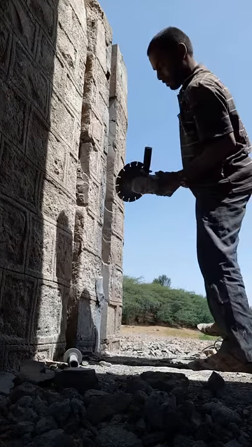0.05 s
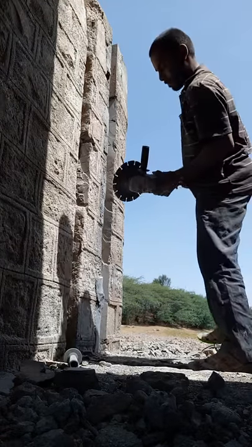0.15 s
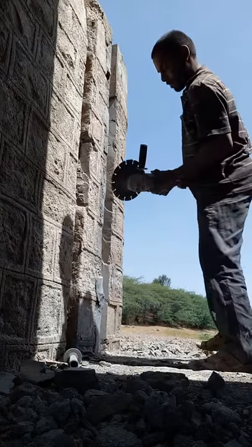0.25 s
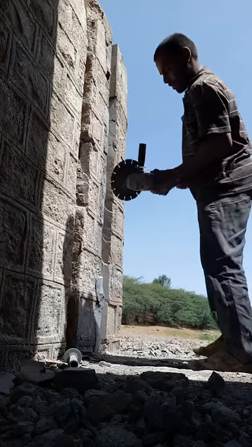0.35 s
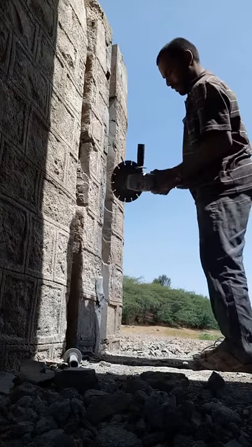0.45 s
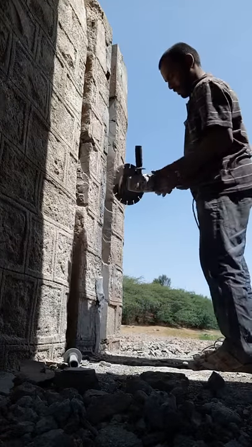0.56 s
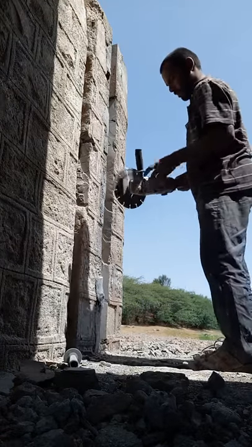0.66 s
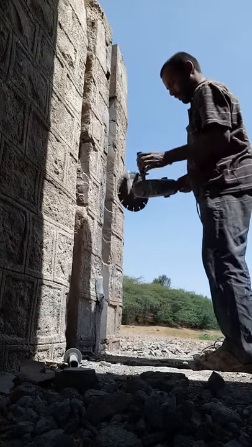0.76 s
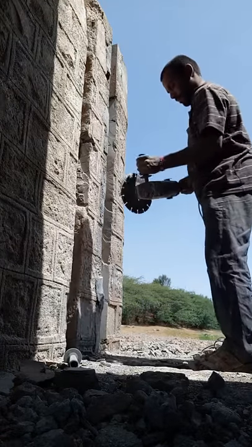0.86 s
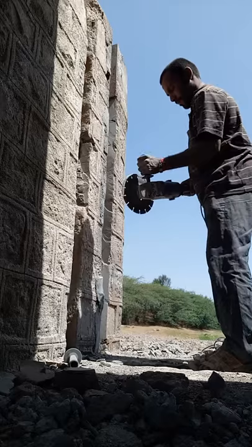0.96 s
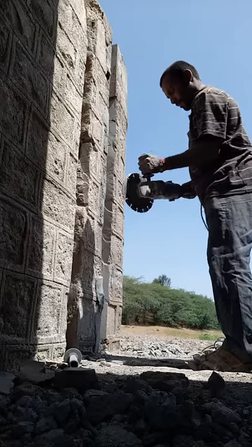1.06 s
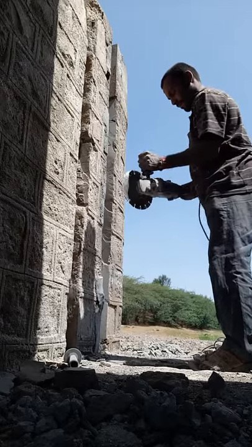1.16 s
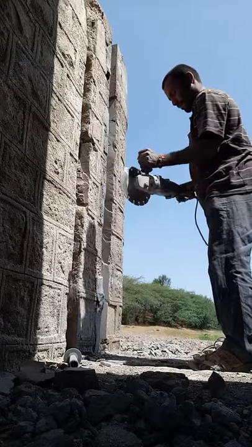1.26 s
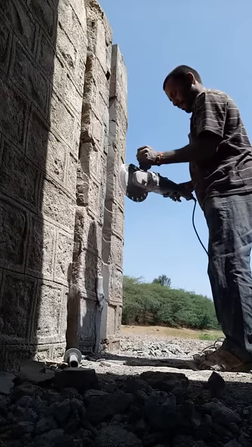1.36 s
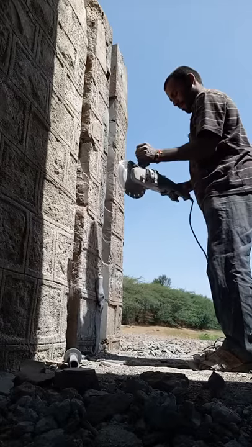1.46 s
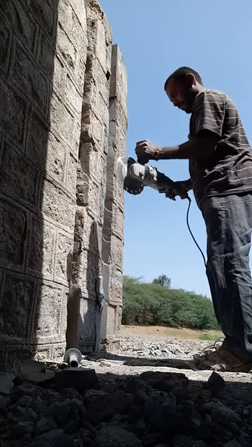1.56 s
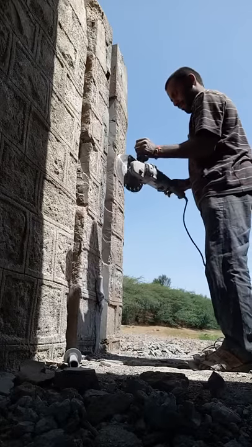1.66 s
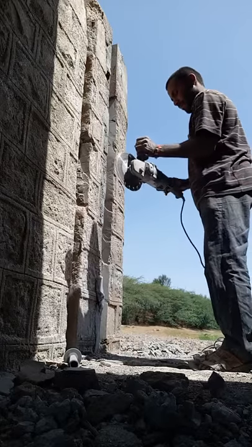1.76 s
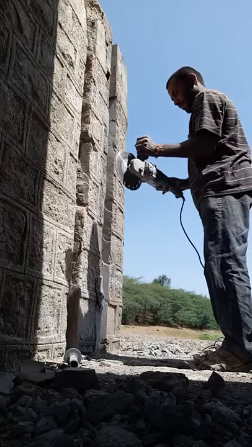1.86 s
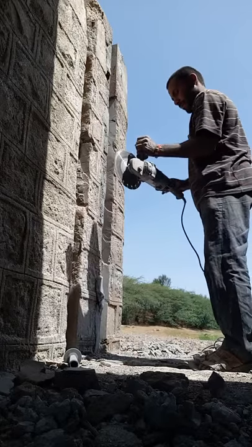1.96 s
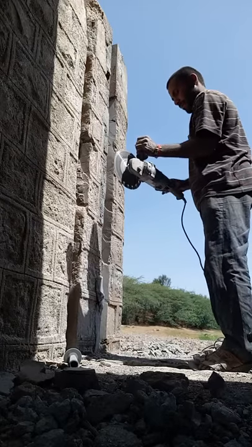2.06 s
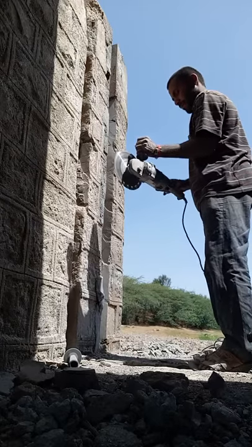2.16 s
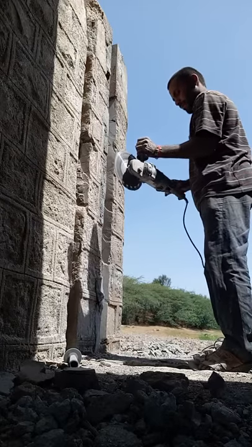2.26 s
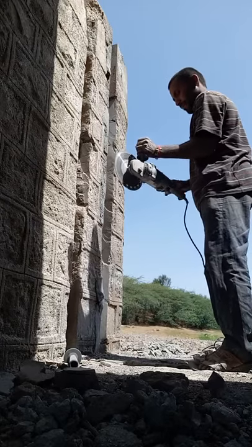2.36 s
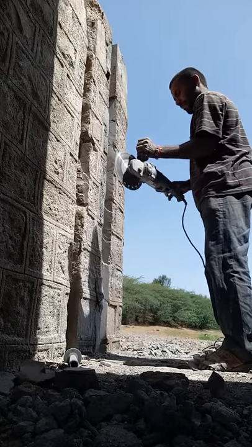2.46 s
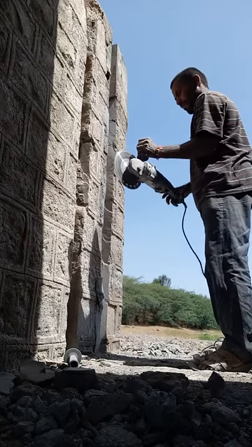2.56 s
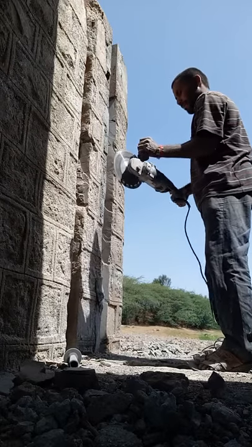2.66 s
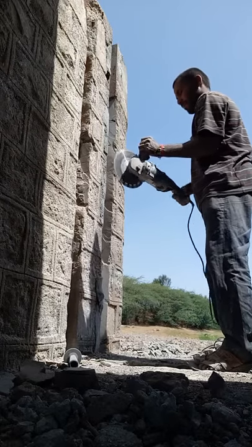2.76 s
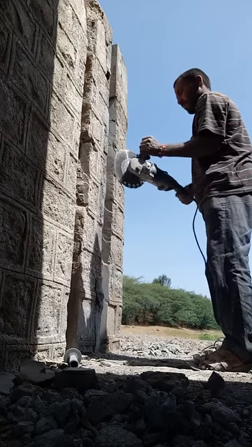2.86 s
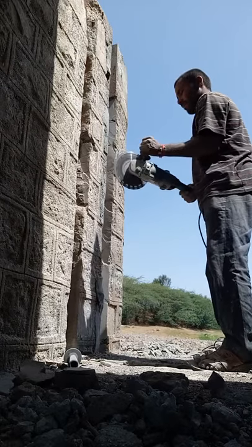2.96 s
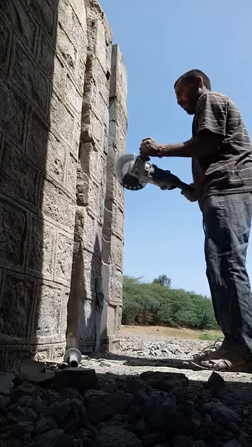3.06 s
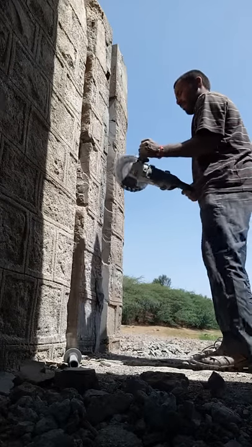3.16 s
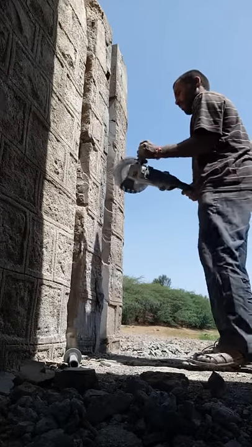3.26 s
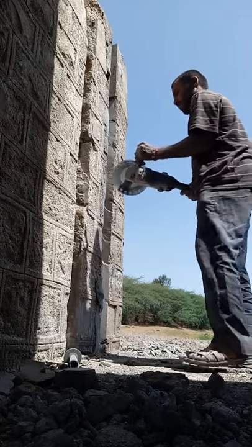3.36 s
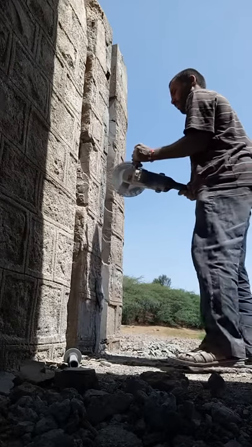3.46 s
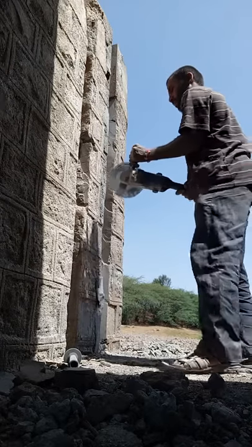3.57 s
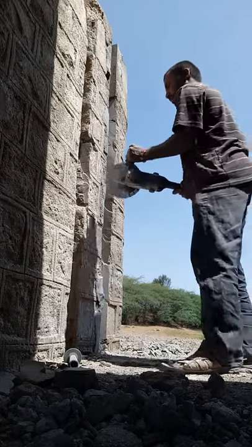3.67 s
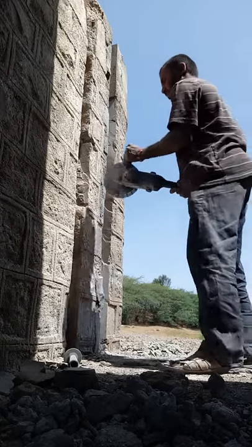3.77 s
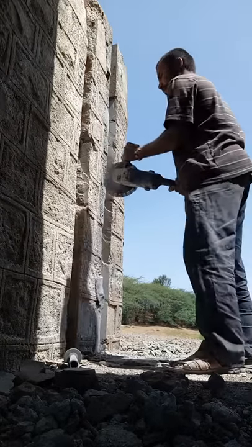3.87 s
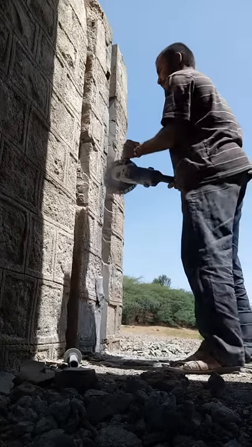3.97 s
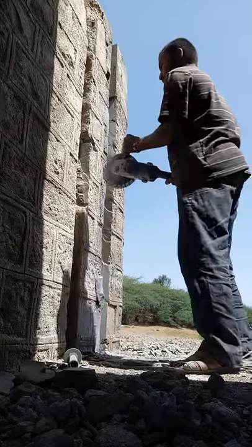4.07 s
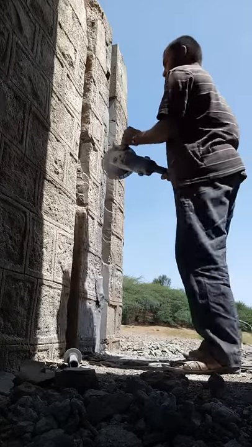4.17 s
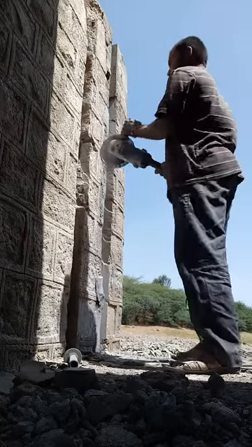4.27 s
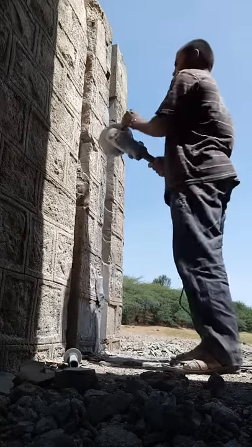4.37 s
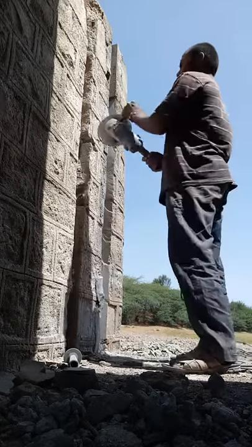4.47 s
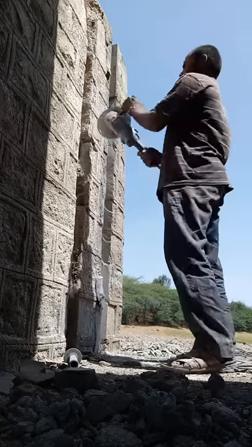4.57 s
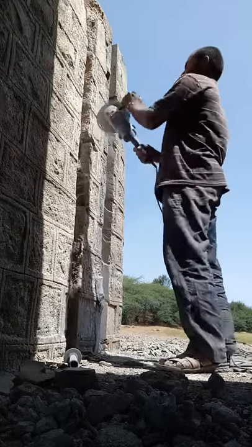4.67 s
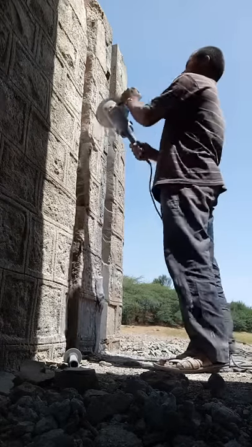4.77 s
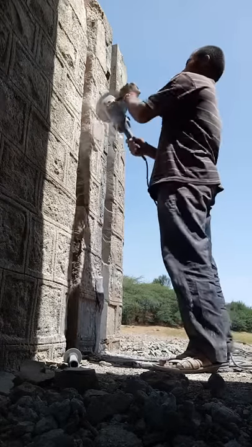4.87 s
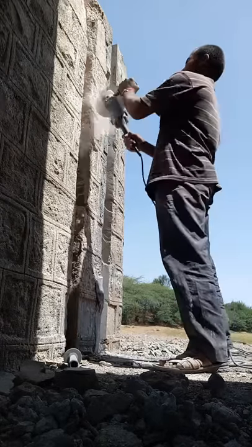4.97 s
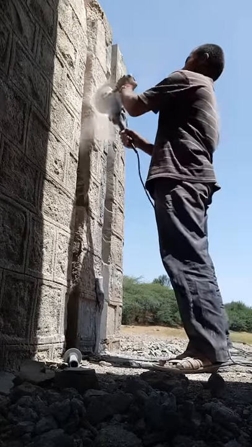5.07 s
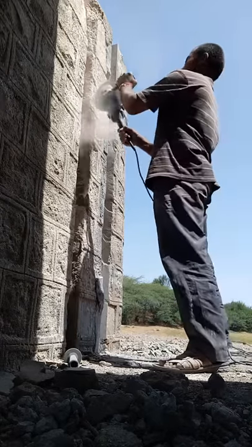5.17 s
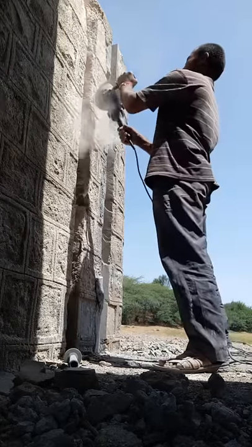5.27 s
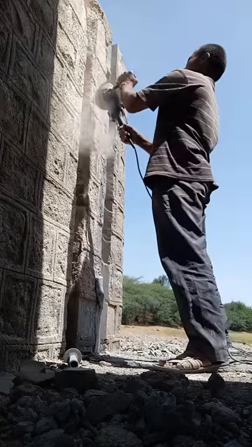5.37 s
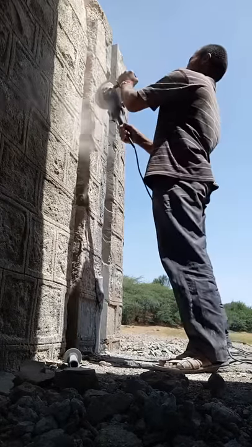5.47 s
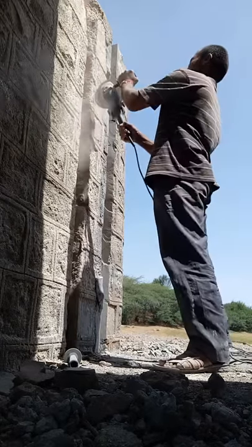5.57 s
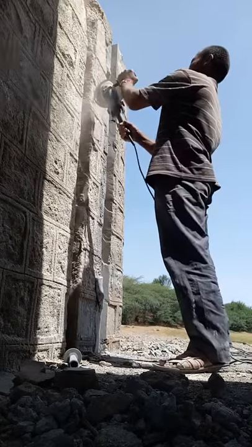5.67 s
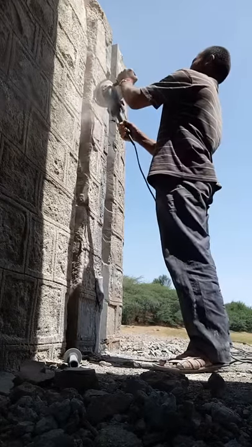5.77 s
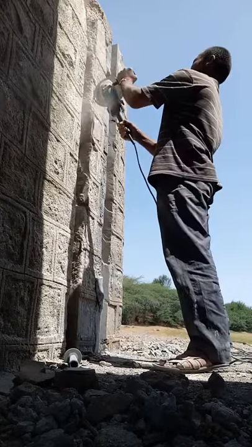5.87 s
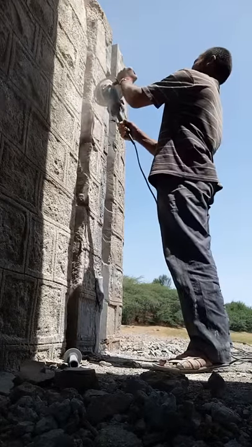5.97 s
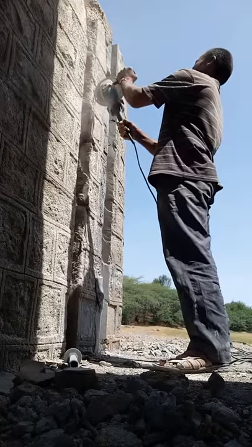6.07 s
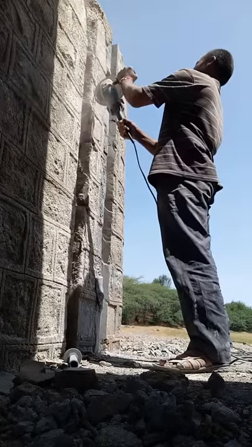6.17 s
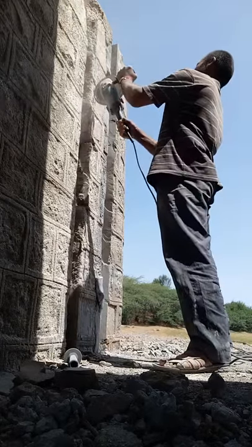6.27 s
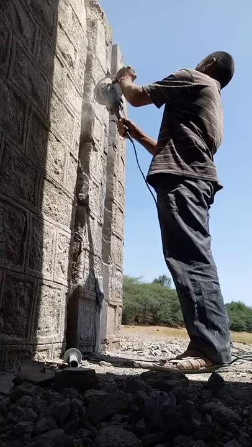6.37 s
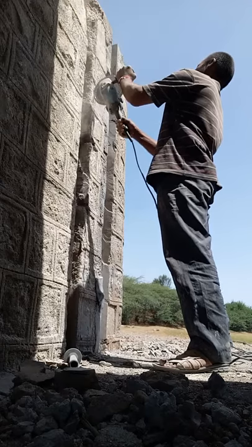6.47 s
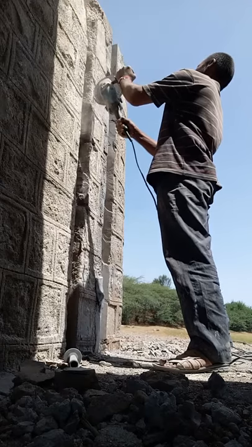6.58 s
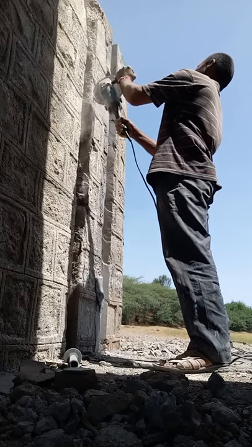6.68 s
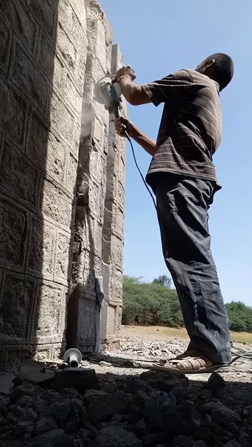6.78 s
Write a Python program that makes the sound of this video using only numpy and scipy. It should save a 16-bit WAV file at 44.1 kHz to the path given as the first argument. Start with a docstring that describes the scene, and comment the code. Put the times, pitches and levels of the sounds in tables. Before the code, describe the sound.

Soft handling knocks, then a large angle grinder clicks on, buzzes, rattles and squeals up to a harsh whine before its blade bites stone.

```python
"""Soft knocks, brushing clothes and a step on loose stones: a large angle grinder is gripped outdoors.
Switched on, it buzzes at twice the mains frequency; its gears rattle by impact in a resonant case as it runs up.
A dry bearing squeals by stick-slip; brush crackle, turbulent cooling air and a thin rotor whine take over.
The diamond blade grazes a stone wall three times, then bites: random grit impacts ring the modes of its disc."""
import sys
import numpy as np
from scipy import signal
from scipy.fft import rfft, irfft
from scipy.io import wavfile
from scipy.ndimage import uniform_filter1d

SR = 44100
rng = np.random.default_rng(int(sys.argv[2]) if len(sys.argv) > 2 else 0)


def master(y):
    """Save y as 16-bit WAV."""
    cut = np.clip(np.atleast_2d(y).T, -1, 1)
    pcm = np.round(cut * 32767)  # scale
    wavfile.write(sys.argv[1], SR, pcm.astype(np.int16))


N = 300321
TIME = np.arange(N) / SR  # s

SWITCH_ON_S, MAINS_HZ = 1.138, 50
# run-up towards a top speed in turns per s, with two time constants; then a steady sag in the cut
TOP_HZ, SPIN_UP_S, CURRENT_RISE_S, SAG_HZ_PER_S = 442.8, 1.57, .092, 15


def motor_speed():
    """Second-order run-up: torque waits for the current, speed nears its limit, then the cut drags it down."""
    age = np.maximum(TIME - SWITCH_ON_S, 0)
    slow_part = SPIN_UP_S * np.exp(-age / SPIN_UP_S)
    fast_part = CURRENT_RISE_S * np.exp(-age / CURRENT_RISE_S)
    shortfall = (slow_part - fast_part) / (SPIN_UP_S - CURRENT_RISE_S)
    sag = SAG_HZ_PER_S * np.maximum(TIME - BITE_EVENTS[0][0], 0)
    return np.maximum(TOP_HZ * (1 - shortfall) - sag, 0)


# force of the gear rattle, easing as the run-up ends: t/s, level/dB
GEAR_FORCE_CURVE = [(1.15, -17), (2.1, -17.5), (2.7, -18.5), (3.4, -22.5), (3.52, -31.5), (4.3, -29.5),
                    (4.9, -24), (5.05, -34), (6.8, -36)]
# brief dips in level, applied here to the rattle: t/s, depth/dB
LEVEL_DIPS = [(1.63, 6), (2.935, 7), (4.73, 10.5)]
# resonances of the gear case: f/Hz, width/Hz, level/dB
CASE_MODES = [(259.3, 23, -12.5), (849, 51, -8), (1140, 64, -28), (1201.6, 11.6, 5.5), (1227.7, 25.2, 11.5),
              (1640, 54, -27), (1825, 32, -8.5), (3220, 22, 2), (3400, 37, 1), (3623, 17.6, -1.5),
              (3600, 28, -10), (4355, 125, -17.5), (6620, 105, -11.5), (7110, 70, -17)]
# spectrum of the dense, unresolved clatter: f/Hz, level/dB
CLATTER_SPECTRUM = [(60, -36), (150, -41), (270, -19), (500, -25.5), (750, -2.5), (1100, -3.5), (1500, 1.5),
                    (2700, -5), (3500, 1), (5000, -11), (7100, -1), (7600, -28), (11500, -22), (13500, -37),
                    (15400, -27)]
DIP_S = .013
# the stutter deepens with speed; the dragging bearing damps the rattle
STUTTER_PER_S, STUTTER_DB, STUTTER_GROWTH_DB, DRAG_DB = 11, 0.73, 2.5, 5.5
RING_DAMPING_DB = 1.5  # the case rings less at top speed, where the teeth stay in contact


def gears(speed):
    """Backlash impact: teeth knock at random and excite the case modes, less while the bearing drags."""
    share = speed / TOP_HZ
    level_db, = in_time(GEAR_FORCE_CURVE)
    drag = squealing()
    drag_db = DRAG_DB * drag / drag.max()
    stutter_db = (STUTTER_DB + STUTTER_GROWTH_DB * share ** 4) * drift(STUTTER_PER_S)
    dip_db = sum(db * np.exp(-((TIME - s) / DIP_S) ** 2) for s, db in LEVEL_DIPS)
    force = from_db(level_db - dip_db - drag_db + stutter_db + drift(35))
    ringing = resonate(grains(per_s=5000, spread_db=0.0), CASE_MODES)
    ringing = colour(ringing, [(60, -18), (250, 0), (7200, 6), (7700, -9.0), (15000, -32)])
    # a steady drive keeps the ring from swelling far above its mean
    ringing = rms_one(ringing / uniform_filter1d(ringing ** 2, SR // 40) ** 0.39)
    clatter = colour(grains(per_s=3100, spread_db=3.5), CLATTER_SPECTRUM)
    ring_gain = from_db(-0.9 - RING_DAMPING_DB * share ** 2)
    return force * (ring_gain * ringing + from_db(-7.5) * clatter)


# spells of drag in the dry bearing: t/s, length/s, level/dB
SQUEAL_EVENTS = [(1.586, 0.04, -30), (1.648, 0.3, -22), (2.032, 0.44, -37.5), (2.463, 0.77, -37)]
SQUEAL_ATTACK_S, SQUEAL_RELEASE_S = 0.007, 0.029


def squealing():
    """Dry friction: the gain of the bearing's drag over time."""
    return sum(from_db(db) * held(s, length, SQUEAL_ATTACK_S, SQUEAL_RELEASE_S)
               for s, length, db in SQUEAL_EVENTS)


# resonances of the bearing: f/Hz, width/Hz, level/dB
BEARING_MODES = [(3300, 34, 1), (4400, 150, -4.5), (6730, 30, 12), (6730, 87, 8.5), (6960, 74, 6),
                 (8340, 62, -2), (9820, 160, -17), (10420, 130, -1.5), (10820, 120, -5), (11530, 320, -5.5)]


def bearing():
    """Stick-slip friction: tiny slips, in throbs at 31 Hz, excite the bearing's resonances."""
    throb = np.sin(2 * np.pi * 31 * TIME + 0.68 * drift(4.4))
    slips = grains(per_s=11000, spread_db=4.0) * squealing() * from_db(4.3 * throb)
    return colour(resonate(slips, BEARING_MODES),
                  [(200, -16), (2000, 11.5), (7200, -1), (7700, -9), (9200, -6), (9800, 7.5),
                   (11800, -1.5), (13000, -11)])


# strength of the rotor whine against its own frequency: f/Hz, level/dB
WHINE_RESPONSE = [(6000, -67), (8000, -47), (9400, -41), (10900, -33.5), (11500, -44.5), (12100, -39.5),
                  (12500, -43), (12750, -39), (12900, -54)]
# housing response through which the tooth mesh climbs: f/Hz, level/dB
HOUSING_RESPONSE = [(2000, -31), (2700, 3), (2950, 0), (3250, 11), (3450, 6.5), (3700, 9), (3950, 3),
                    (4250, 11.5), (4450, 6.5), (5200, -11.5)]
PINION_TEETH, WHINE_ORDER = 11, 30  # multiples of the turning rate
HUM_DB, HUM_PEAK_HZ, HUM_WIDTH_HZ = -47.5, 327, 29  # the body resonance that the unbalance passes
# near full speed the tooth mesh gives way to a roar on the second and third orders
ROAR_FROM_HZ, ROAR_SPREAD_HZ, ROAR_RISE_DB, SECOND_DB, THIRD_DB = 385, 4.8, 13.5, -40, -33
MESH_DB, MESH_FALL_DB = -32, 7


def tones(speed):
    """Rotating orders: unbalance hum, gear roar, tooth mesh and whine lie at multiples of the turning rate."""
    turn = 2 * np.pi * np.cumsum(speed) / SR  # rotor angle in radians
    roaring = .5 + .5 * np.tanh((speed - ROAR_FROM_HZ) / (2 * ROAR_SPREAD_HZ))
    roar = speed / TOP_HZ * from_db(ROAR_RISE_DB * (roaring - 1.5))

    resonance = 1 / np.hypot(1, (speed - HUM_PEAK_HZ) / HUM_WIDTH_HZ)
    hum_gain = grown(speed, HUM_PEAK_HZ, 2.5) * from_db(HUM_DB + 2 * drift(14)) * resonance
    hum = hum_gain * np.sin(turn)

    whine_db = np.interp(WHINE_ORDER * speed, *np.transpose(WHINE_RESPONSE))
    whine = from_db(whine_db + 3 * drift(18)) * np.sin(WHINE_ORDER * turn + .7 * drift(60))
    second = roar * from_db(SECOND_DB + 2 * drift(30)) * np.sin(2 * turn + 0.6 * drift(30))
    third = roar * from_db(THIRD_DB + 0.62 * drift(37)) * np.sin(3 * turn + 1.47 * drift(50))

    teeth = from_db(2 * drift(60)) * np.sin(PINION_TEETH * turn + 3.8 * drift(150))
    housed = rms_one(scatter(colour(teeth, HOUSING_RESPONSE), db=4, t60=0.2))
    mesh = from_db(MESH_DB - MESH_FALL_DB * roaring) * housed
    return np.sqrt(2) * (hum + whine + second + third + mesh)


# spectrum of cooling air and brushes: f/Hz, level/dB
AIR_SPECTRUM = [(40, -38), (150, -28), (280, -14), (500, -16.5), (850, -4.5), (2800, -6.5), (4300, -2.5),
                (5200, -3), (6500, 2.5), (7500, -8), (8800, -19), (10500, -13.5), (13200, -23.5),
                (15000, -12)]
# growth by a power of speed up to a knee; the level drops at the first bite and stays down
RUSH_DB, RUSH_KNEE_HZ, RUSH_POWER, RUSH_DROP_DB = -18.5, 354, 2.38, 15


def rush(speed):
    """Flow noise and spark discharge: broadband air and brush crackle grow by a power of speed."""
    in_stone = np.clip((TIME - BITE_EVENTS[0][0]) / BITE_ATTACK_S, 0, 1)
    level_db = RUSH_DB - RUSH_DROP_DB * in_stone + 0.64 * drift(30)
    sparks = grains(per_s=1100, spread_db=2.0)
    source = 0.69 * rng.standard_normal(N) + 0.5 * sparks
    return colour(source * from_db(level_db) * grown(speed, RUSH_KNEE_HZ, RUSH_POWER), AIR_SPECTRUM)


# the loudest sparks at the brushes, before the housing rings: t/s, level/dB
LOUD_SNAPS = [(4.4187, -20), (4.531, -19), (5.0204, -16), (5.1202, -18), (5.173, -22), (5.5632, -17),
              (6.293, -19), (6.3508, -17)]
# weaker snaps come at random above a certain speed
SNAPS_PER_S, SNAP_DB, SNAP_SPREAD_DB, SNAP_FROM_HZ = 18, -22, 1.5, 385
SNAP_RING_DB = 23  # gain of the housing that the snaps ring in


def snaps(speed):
    """Impulse response: single big sparks crack and ring the motor housing."""
    born = (rng.random(N) < SNAPS_PER_S / SR) & (speed > SNAP_FROM_HZ)
    cracks = born * from_db(SNAP_DB + SNAP_SPREAD_DB * rng.standard_normal(N))
    for s, db in LOUD_SNAPS:
        cracks[int(s * SR)] = from_db(db)
    rung = resonate(cracks, [(1300, 400, -14), (4680, 260, 0), (6200, 1200, -18)])
    return from_db(SNAP_RING_DB) * rung


FAN_BLADES = 15
FAN_DB, FAN_WIDTH_HZ, FAN_KNEE_HZ, FAN_POWER = -27.5, 570, 276, 2.6


def fan(speed):
    """Amplitude modulation: fan blades chop turbulence into a band of hiss that climbs with speed."""
    lowpass = signal.butter(2, FAN_WIDTH_HZ, fs=SR, output="sos")
    eddies = rms_one(signal.sosfilt(lowpass, rng.standard_normal(N)))
    chop = np.sqrt(2) * np.sin(2 * np.pi * FAN_BLADES * np.cumsum(speed) / SR)
    return from_db(FAN_DB) * grown(speed, FAN_KNEE_HZ, FAN_POWER) * eddies * chop


# the blade pressed into the stone: t/s, length/s, level/dB
BITE_EVENTS = [(6.603, 0.091, -19), (6.746, .05, -17.5)]
# light grazes of the blade: t/s, level/dB, fall time/s
GRAZE_EVENTS = [(5.193, -23.5, 0.18), (5.798, -21.5, 0.092), (6.41, -21.5, 0.15)]
# modes of the steel disc: f/Hz, level/dB
DISC_MODES = [(540, -54), (1280, -37), (1410, -38), (1750, -42), (2260, -43), (2780, -43), (3190, -39),
              (3569, -34), (3768, -33), (4235, -37), (4280, -35), (4484, -40), (5076, -40), (5394, -32),
              (6051, -27), (6148, -31), (6853, -40), (7348, -41), (7660, -37), (7790, -42), (8974, -42),
              (9405, -44), (10406, -40), (10794, -44), (12188, -46), (13586, -45), (14131, -46),
              (14745, -37), (14998, -39), (15248, -32), (15483, -39)]
# spectrum of grit tearing stone: f/Hz, level/dB
GRIT_SPECTRUM = [(150, -45), (500, -29), (1000, -33), (1300, -6), (2300, -8), (3500, 0), (4800, -7),
                 (6100, 3.5), (7600, 2), (8600, -1), (10300, 4), (13000, -7.5), (14300, 5), (15400, 3.5)]
BITE_ATTACK_S, BITE_RELEASE_S = 0.0086, 0.08
SINGING_DB = -31  # drive of the free disc at top speed


def blade(speed):
    """Modal excitation: grit impacts tear the stone and ring the disc; grazes favour its top modes."""
    pressure = np.max([from_db(db) * held(s, length, BITE_ATTACK_S, BITE_RELEASE_S)
                       for s, length, db in BITE_EVENTS], axis=0)
    bite = pressure * grains(per_s=6600, spread_db=2.5)
    graze = sum(from_db(db) * (TIME > s) * np.exp(-((TIME - s) / fall) ** 2)
                for s, db, fall in GRAZE_EVENTS)
    light = colour(graze * grains(per_s=4600, spread_db=4.0),
                   [(1000, -13), (3500, 3), (6000, -10.0), (11000, -1.5), (13500, 5), (15500, 3.5)])
    disc = resonate(bite + light, [(hz, 15, db) for hz, db in DISC_MODES])
    tearing = scatter(colour(bite + .5 * light, GRIT_SPECTRUM), db=-9, t60=0.15)
    # near full speed the free disc sings faintly by itself
    shake = from_db(SINGING_DB) * (speed / TOP_HZ) ** 5 * rng.standard_normal(N)
    singing = resonate(shake, [(hz, 16, db) for hz, db in DISC_MODES if hz < 5500])
    return disc + tearing + singing


# harmonics of the mains buzz: f/Hz, level/dB
MAINS_HARMONICS = [(200, -17), (300, -23), (400, -17), (700, -15), (1100, -7), (1200, 0)]
# resonances of the stator, jolted by the current: f/Hz, width/Hz, level/dB
STATOR_MODES = [(1090, 140, 2), (2300, 760, -22), (6860, 350, -16.5), (11600, 900, -33)]
STATOR_DB = 0
# a surge at switch-on, then a remainder that falls as the motor gains speed
SURGE_DB, SURGE_S, SURGE_RELEASE_S, BUZZ_DB, BUZZ_POWER = -31.5, 0.24, .06, -42.5, 1.3


def buzz(speed):
    """Magnetic force at twice the mains frequency jolts the motor; so small a body radiates no deep bass."""
    surge = from_db(SURGE_DB) * held(SWITCH_ON_S, SURGE_S, 1 / SR, SURGE_RELEASE_S)
    current = np.maximum(surge, from_db(BUZZ_DB) * (1 - speed / TOP_HZ) ** BUZZ_POWER)
    jolts = np.diff(np.floor(TIME * 2 * MAINS_HZ), prepend=0) * from_db(0.81 * drift(69))
    shaken = rms_one(scatter(colour(jolts, CLATTER_SPECTRUM), db=11, t60=0.037))
    rasp = rng.standard_normal(N) * (1 + .5 * np.cos(4 * np.pi * MAINS_HZ * TIME))
    rung = colour(resonate(rasp, STATOR_MODES), [(8000, 0), (12000, -2), (13500, -12)])
    stator = from_db(STATOR_DB) * rms_one(rung)
    hum = sum(from_db(db) * np.sin(2 * np.pi * hz * TIME + 0.4 * drift(17)) for hz, db in MAINS_HARMONICS)
    onset = np.clip((TIME - SWITCH_ON_S) / 0.0091, 0, 1)
    sound = onset * current * np.sqrt(2) * (shaken + stator + hum)
    return signal.sosfilt(signal.butter(4, 170, "high", fs=SR, output="sos"), sound)


RUMBLE_DB, RUMBLE_HZ, RUMBLE_WIDTH_HZ = -52.5, 269, 21


def rumble(speed):
    """Noise-driven resonance: turbulent air stirs a low mode of the body, mostly near full speed."""
    body = resonate(rng.standard_normal(N), [(RUMBLE_HZ, RUMBLE_WIDTH_HZ, 0)])
    return from_db(RUMBLE_DB) * (speed / TOP_HZ) ** 6 * body


# knocks on the tool, the last being the trigger: t/s, level/dB, 60 dB decay/s
KNOCK_EVENTS = [(.176, -54, .07), (.322, -56, .07), (.44, -43, .045), (.517, -41, .085), (.566, -45, .07),
                (.882, -43, .06), (.961, -41.5, .07), (1.13, -25, .015)]
# feet and clothes shifting: t/s, level/dB, half length/s
SCUFF_EVENTS = [(0.015, -63, .05), (.19, -58, 0.045), (.35, -61, 0.038), (0.656, -54, 0.056),
                (0.89, -55, 0.015), (0.956, -57.5, 0.045)]
# one step on loose stones: t/s, level/dB, 60 dB decay/s
STONE_STEP = (.566, -37.5, .18)
# spectrum of fingers on the tool: f/Hz, level/dB
FINGER_SPECTRUM = [(100, -12), (700, -6), (1200, 0), (2500, -8), (4200, -8), (5000, -24), (15000, -34)]
# spectrum of rubbing cloth: f/Hz, level/dB
CLOTH_SPECTRUM = [(150, -30), (700, -11), (1900, -0.5), (4500, -8), (6600, 1), (8500, -12), (12500, -15),
                  (15000, -5.5)]
# spectrum of shifting stones: f/Hz, level/dB
GRAVEL_SPECTRUM = [(40, -16), (200, -11), (650, -7.5), (1200, -9), (1820, 6), (2400, -7), (4200, -16),
                   (6000, -38), (12000, -57)]
KNOCK_ATTACK_S, KNOCK_GAIN_DB = 0.0018, -1.5


def handling():
    """Soft impact and friction: hands knock on the tool, clothes brush, a foot lands on stones."""
    blows = sum(burst(*row) for row in KNOCK_EVENTS) * grains(per_s=16000, spread_db=-0.5)
    knocks = from_db(KNOCK_GAIN_DB) * colour(blows, FINGER_SPECTRUM)
    scuffs = sum(from_db(db) * np.exp(-((TIME - s) / half) ** 2 / 2) for s, db, half in SCUFF_EVENTS)
    rubbing = scuffs * grains(per_s=15000, spread_db=8.0)
    step = colour(burst(*STONE_STEP) * grains(per_s=4800, spread_db=-3), GRAVEL_SPECTRUM)
    tool = resonate(.45 * knocks + .15 * rubbing, CASE_MODES) + .13 * colour(knocks, CLATTER_SPECTRUM)
    return tool + scatter(colour(rubbing, CLOTH_SPECTRUM) + step, db=1, t60=0.067)


# spectrum of quiet open ground: f/Hz, level/dB
OUTDOOR_SPECTRUM = [(25, -11), (60, -5), (200, -14.5), (500, -15), (950, -17), (1210, -1), (1500, -18),
                    (1820, -7.5), (2600, -21), (3400, -13), (4500, -15), (6500, -17), (8500, -34),
                    (13500, -40), (15000, -24)]
PUFF_AT_S, PUFF_S, PUFF_DB = 6.787, 0.013, -33


def air():
    """Stationary noise of open ground, and one low turbulent puff of wind on the microphone."""
    puff = from_db(PUFF_DB) * np.exp(-((TIME - PUFF_AT_S) / PUFF_S) ** 2)
    wind = colour(puff * rng.standard_normal(N),
                  [(25, -13), (80, -14), (170, 0), (300, -5), (600, -14), (2000, -48)])
    return from_db(-65.5) * colour(rng.standard_normal(N), OUTDOOR_SPECTRUM) + wind


def from_db(db):
    """Level law: decibels to amplitude gain."""
    return 10 ** (np.asarray(db) / 20)


def rms_one(x):
    """Normalisation: scale to unit power."""
    return x / np.sqrt(np.mean(x ** 2) + 1e-20)


def in_time(rows):
    """Linear interpolation: each column of a curve, sample by sample."""
    s, *columns = np.transpose(rows)
    return [np.interp(TIME, s, column) for column in columns]


def drift(rate):
    """Slow random fluctuation of unit rms, with 2 * rate knots per second."""
    knots = rng.standard_normal(int(N / SR * rate * 2) + 3)
    return rms_one(np.interp(TIME * rate * 2, np.arange(len(knots)), knots))


def grains(per_s, spread_db):
    """Shot noise: random tiny impacts of uneven size and either sign, rms 1."""
    sizes = from_db(spread_db * np.minimum(rng.exponential(1, N), 4))
    struck = rng.random(N) < per_s / SR
    return rms_one(sizes * rng.choice([-1, 1], N) * struck)


def burst(start, db, t60):
    """Exponential decay: envelope of a soft blow that falls 60 dB in t60."""
    attack = np.clip((TIME - start) / KNOCK_ATTACK_S, 0, 1)
    return attack * from_db(db - 60 * np.clip((TIME - start) / t60, 0, 3))


def held(start, length, attack, release):
    """Envelope with a linear rise, a hold and an exponential release."""
    rise = np.clip((TIME - start) / attack, 0, 1)
    return rise * np.exp(-np.clip((TIME - start - length) / release, 0, 30))


def grown(speed, knee_hz, power):
    """Power law of speed: a gain that levels off at a knee."""
    return np.minimum(speed / knee_hz, 1) ** power


def colour(x, spectrum, size=4096):
    """Minimum-phase filtering: a causal response of unit power gain follows a spectrum."""
    hz, db = np.transpose(spectrum)
    grid = np.maximum(np.fft.rfftfreq(size, 1 / SR), 1)
    gain = from_db(np.interp(np.log(grid), np.log(hz), db))
    # folding the cepstrum onto positive times makes the response causal
    cepstrum = irfft(np.log(gain))
    cepstrum[1:size // 2] *= 2
    cepstrum[size // 2 + 1:] = 0
    response = irfft(np.exp(rfft(cepstrum)))
    return signal.oaconvolve(x, response / np.linalg.norm(response))[:N]


def resonate(x, modes, size=8192):
    """Modal superposition: parallel damped modes (f/Hz, width/Hz, peak level/dB), unit power gain in all."""
    t = np.arange(size) / SR
    response = sum(from_db(db) * width * np.exp(-np.pi * abs(width) * t) * np.cos(2 * np.pi * hz * t)
                   for hz, width, db in modes)
    return signal.oaconvolve(x, response / np.linalg.norm(response))[:N]


def scatter(x, db, t60):
    """Diffuse decay: a short tail of countless weak modes of the tool and echoes off the rough stone."""
    t = np.arange(SR // 5) / SR
    tail = rng.standard_normal(len(t)) * from_db(-60 * t / t60) * (t > .001)
    wet = signal.oaconvolve(x, tail / np.linalg.norm(tail))[:N]
    return (x + from_db(db) * wet) / np.hypot(1, from_db(db))


def scene():
    """Superposition: the sources of the tool, the stone and the open air add linearly."""
    speed = motor_speed()
    on = TIME >= SWITCH_ON_S
    metal = scatter(on * (gears(speed) + bearing()), db=-9, t60=.08)
    blown = scatter(rush(speed) + fan(speed) + snaps(speed), db=-13, t60=.06)
    running = metal + blown + rumble(speed) + buzz(speed) + on * tones(speed)
    return (running + blade(speed) + handling() + air())[None]


CUTOFF_HZ = 15600


def record(dry):
    """Soft saturation and band limiting: the tallest peaks are rounded and the top is cut."""
    rounded = dry / (1 + (dry / .6) ** 6) ** (1 / 6)
    return signal.sosfilt(signal.ellip(12, .1, 70, CUTOFF_HZ, fs=SR, output="sos"), rounded)


dry = scene()
out = record(dry)
master(out)
```